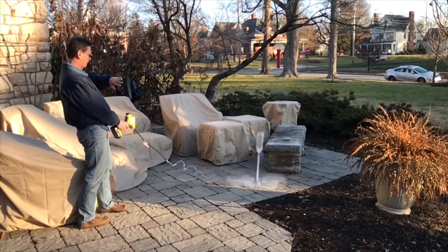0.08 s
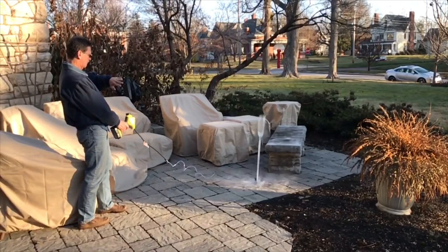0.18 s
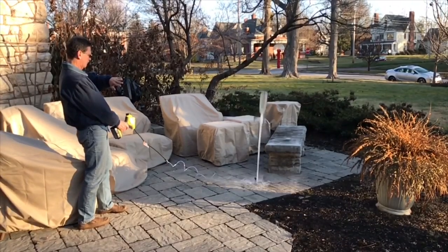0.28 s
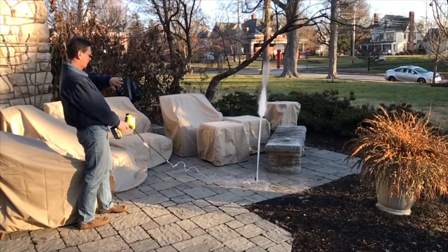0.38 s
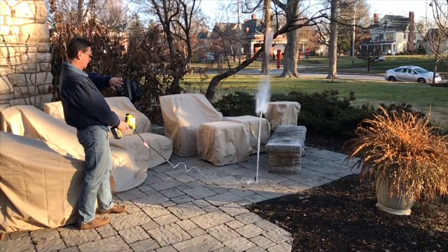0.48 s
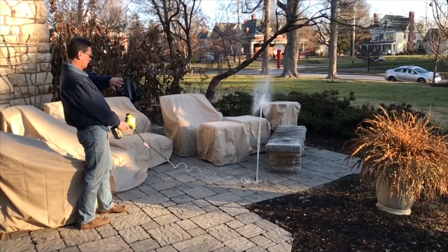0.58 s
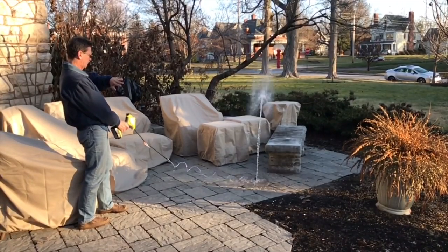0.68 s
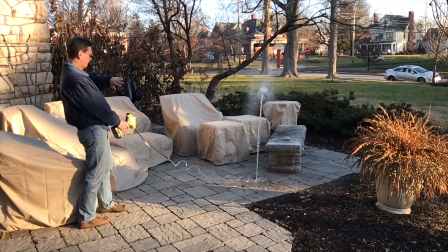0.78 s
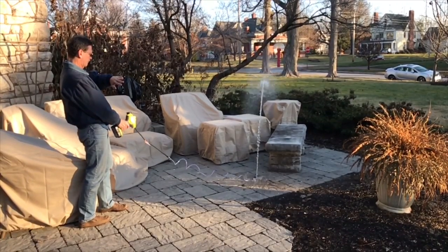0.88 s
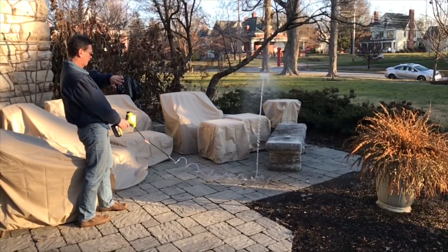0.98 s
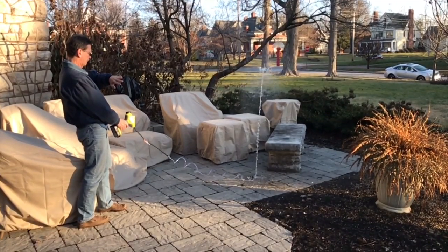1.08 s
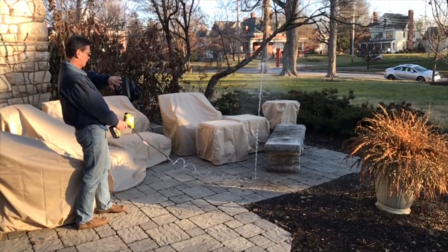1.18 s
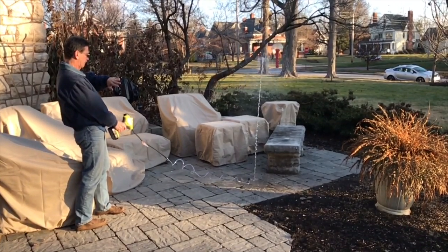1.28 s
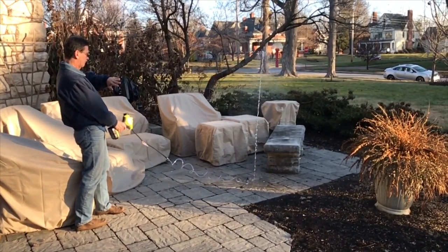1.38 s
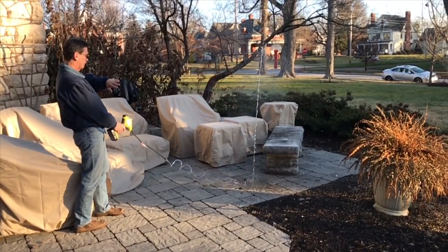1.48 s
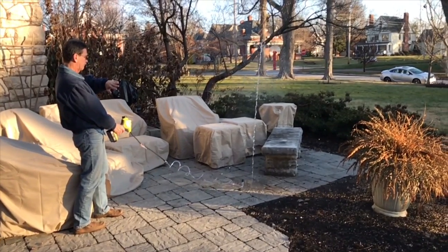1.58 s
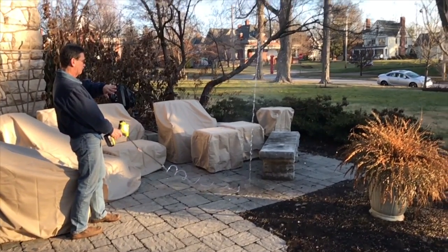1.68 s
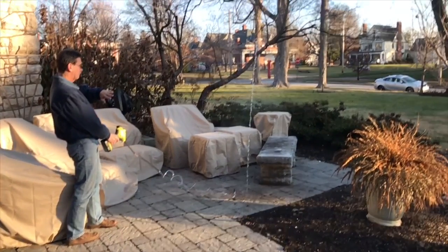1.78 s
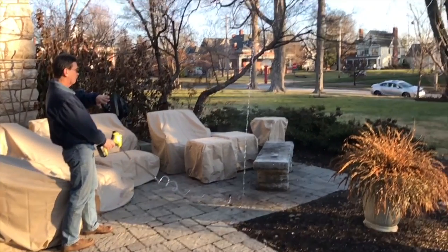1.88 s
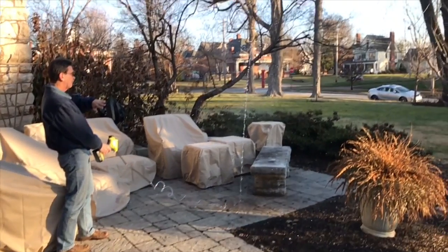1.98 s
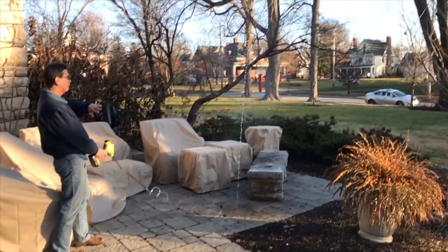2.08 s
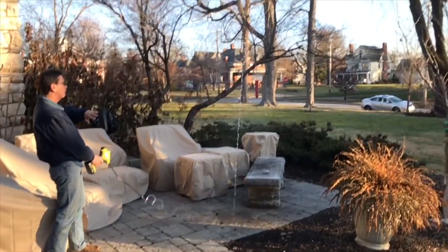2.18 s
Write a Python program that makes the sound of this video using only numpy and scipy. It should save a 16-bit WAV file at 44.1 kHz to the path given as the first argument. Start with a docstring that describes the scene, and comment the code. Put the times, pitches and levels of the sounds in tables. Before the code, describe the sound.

A water rocket pops and whooshes off, then water splashes down as a drill-driven pump rattles.

```python
"""A small air pump rattles and hums on a stone patio, driven by a cordless drill.
A water rocket pops off its stopper: water thumps out, air blasts after it, the rush fades.
Half a second later the water slaps the paving and trails off in drops while the pump runs on.
Under it lie a low outdoor murmur and one soft gust. Nothing sounds above about 2.3 kHz."""
import sys
import numpy as np
from scipy.fft import rfft, irfft
from scipy.io import wavfile

SR = 44100
rng = np.random.default_rng(int(sys.argv[2]) if len(sys.argv) > 2 else 0)


def inscribe(sig):
    """Save sig as 16-bit PCM at rate SR to the path in sys.argv[1].

    A 1-D sig is mono; a 2-D sig holds one channel per row.
    Samples are clipped to [-1, 1] before scaling.
    """
    pcm = np.round(np.clip(np.atleast_2d(sig).T, -1, 1) * 32767)
    wavfile.write(sys.argv[1], SR, pcm.astype(np.int16))


N = 97020
T = np.arange(N) / SR
TOP_HZ = 2310

# stopper pop spectrum: f/Hz, level/dB
POP_SPECTRUM = [(100, -12), (400, -5.5), (700, -5.5), (1000, 7), (1350, -5), (1750, 0), (2300, -9)]
# water leaving the nozzle: t/s, level/dB, f/Hz, rise/s
NOZZLE_GULPS = [(.2422, -5, 124.2, 0.0018), (.2635, -0.5, 143.4, 0.0032), (.2835, -1, 192, 0.0016),
                (.3245, -15, 146.5, 0.0058), (.353, -14.5, 172.7, 0.0052), (.544, -18.5, 137.3, .008)]
# jet hiss spectrum: f/Hz, level/dB
HISS_SPECTRUM = [(80, -4), (250, -2), (500, -0.5), (750, 2.5), (1100, -1), (1600, -0.5), (2000, -2.5),
                 (2400, -8)]
# jet roar spectrum: f/Hz, level/dB
ROAR_SPECTRUM = [(25, -11), (60, -8.5), (100, -4.5), (170, -2), (250, 1.5), (350, -0.5), (520, -5),
                 (650, -22.5), (1200, -24)]
# resonances of the emptying bottle: f/Hz, width/Hz, level/dB
BOTTLE_MODES = [(726, 40, -6), (909, 12, 3), (1489, 40, 0.5), (1660, 20, 1), (1986, 31, -0.5)]
# lumps of water landing: t/s, level/dB, f/Hz, rise/s
WATER_SLAPS = [(.6972, -18.5, 375, 0.0017), (.7146, -11.5, 216, 0.0015), (.7245, -19.5, 162, 0.00271),
               (.738, -19.5, 159, 0.011), (.811, -18, 320, .002), (.8255, -13, 178, 0.0034),
               (1.008, -23, 161, 0.0031)]
# spectrum of the water column landing: f/Hz, level/dB
POUR_SPECTRUM = [(40, -4.5), (110, -0.5), (190, -1), (300, -7.5), (440, 0.5), (600, -20.5), (1200, -24)]
# splash and drop spectrum: f/Hz, level/dB
SPLASH_SPECTRUM = [(100, -11), (400, -10.5), (700, 3.5), (1200, 0.5), (1800, 1), (2300, 4.5)]
# pump stroke peaks: t/s, level/dB
PUMP_STROKES = [(.012, -30), (0.067, -34), (.178, -31.5), (1.001, -33.5), (1.092, -38), (1.21, -34),
                (1.311, -37), (1.479, -39.5), (1.586, -31.5), (1.71, -33), (1.844, -30.5), (1.945, -32),
                (1.977, -32.5), (2.066, -32.5), (2.101, -35.5)]
# pump and drill housing resonances: f/Hz, width/Hz, level/dB
HOUSING_MODES = [(174, 40, -0.5), (337, 130, 2), (536, 92, -5), (873, 22, 6.5), (1091.4, 18, 9.5),
                 (1390, 350, -8.5), (2100, 330, -8.5)]
# motor hum envelope: t/s, level/dB
HUM_ENVELOPE = [(0, -45.5), (.11, -37.5), (.22, -38), (.62, -36.5), (1.0, -37), (1.16, -47), (1.28, -43.5),
                (1.49, -43.5), (1.55, -34.5), (1.6, -38.5), (1.66, -49), (1.88, -42.5), (1.99, -42),
                (2.08, -36.5), (2.2, -42.5)]
# gear whirr spectrum: f/Hz, level/dB
GEAR_SPECTRUM = [(120, -7.5), (300, 2), (450, -0.5), (750, -3), (1090, 0.5), (1250, -1), (1750, -3),
                 (2200, 0), (2500, -4.5)]
# hard contacts: t/s, level/dB, f/Hz, width/Hz, decay/s
CONTACT_TICKS = [(0.172, -28.5, 859, 1368, 0.0044), (.931, -29, 1500, 1180, .003),
                 (1.474, -26.5, 1154, 1433, 0.0032), (1.928, -28, 2197, 200, 0.0099)]
# gust spectrum: f/Hz, level/dB
GUST_SPECTRUM = [(10, 6), (25, -5.5), (50, -10.5), (90, -17.5), (200, -38)]
# air and far traffic spectrum: f/Hz, level/dB
MURMUR_SPECTRUM = [(15, 2.5), (35, -2.5), (70, 2), (130, 4), (250, -3.5), (500, -8.5), (1000, -16),
                   (2400, -18.5)]


def rocket_launch(pop_s=0.2355, blast_s=0.2875):
    """The stopper pops, water jets out in gulps, then air blasts through the neck and recedes."""
    pop = amp(-15.5) * burst(pop_s, attack_s=0.0042, decay_s=0.003) * colour(noise(), POP_SPECTRUM)
    jet_env = amp(-20) * burst(pop_s, attack_s=0.0046, decay_s=0.054)
    blast_env = burst(blast_s, attack_s=0.002, decay_s=0.041)
    rush_env = amp(-22.5) * burst(blast_s, attack_s=0.002, decay_s=0.27)
    hiss_env = np.sqrt(jet_env ** 2 + (amp(-23) * blast_env) ** 2 + rush_env ** 2)
    hiss = hiss_env * colour(noise(), HISS_SPECTRUM)
    bottle = amp(-19.5) * blast_env * ring(noise(), BOTTLE_MODES)
    roar_env = amp(-12) * burst(blast_s, attack_s=0.0067, decay_s=0.064)
    wake_env = amp(-23.5) * burst(pop_s, attack_s=0.0067, decay_s=0.3)
    roar = np.hypot(roar_env, wake_env) * colour(noise(), ROAR_SPECTRUM)
    return pop + thumps(NOZZLE_GULPS) + hiss + bottle + roar


def falling_water(pour_s=0.811, splash_s=0.853):
    """Lumps slap the paving, the column pours and splashes, stray drops patter after it."""
    pour = colour(clicks(per_s=900, spread_db=1), POUR_SPECTRUM)
    pour *= amp(-21.5) * swell(pour_s, rise_s=0.05, fall_s=0.07)
    splash = colour(clicks(per_s=3000, spread_db=0.5), SPLASH_SPECTRUM)
    splash *= amp(-25.5) * swell(splash_s, rise_s=0.026, fall_s=0.04)
    drops = colour(clicks(per_s=1200, spread_db=7.5), SPLASH_SPECTRUM)
    drops *= amp(-34.5) * swell(splash_s, rise_s=0.026, fall_s=0.24)
    patter = ring(clicks(per_s=250, spread_db=6), [(141.6, 110, 0)])
    patter *= amp(-30.5) * swell(splash_s, rise_s=0.05, fall_s=0.2)
    return thumps(WATER_SLAPS) + pour + splash + drops + patter


def drill_pump(stroke_width_s=0.013, hum_hz=176.8, gear_hz=96.9):
    """Each stroke rattles the housing; motor hum and gear whirr follow one wavering speed."""
    stroke_power = sum(amp(db) ** 2 * np.exp(-((T - peak_s) / stroke_width_s) ** 2)
                       for peak_s, db in PUMP_STROKES)
    rattle = np.sqrt(stroke_power) * ring(clicks(per_s=1400, spread_db=3), HOUSING_MODES)
    speed = 1 + 0.05 * wander(rate_hz=25)
    phase_per_hz = 2 * np.pi * np.cumsum(speed) / SR
    hum_db = np.interp(T, *np.array(HUM_ENVELOPE).T) + 1.2 * wander(rate_hz=27)
    hum = amp(hum_db) * np.sqrt(2) * np.sin(hum_hz * phase_per_hz)
    whirr = colour(clicks(per_s=5000, spread_db=0.5), GEAR_SPECTRUM)
    whirr *= 1 + 0.1 * np.sin(gear_hz * phase_per_hz)
    whirr *= amp(-36 + 0.86 * wander(rate_hz=45))
    return rattle + hum + whirr


def lone_ticks(attack_s=0.0013):
    """Short hard contacts, each ringing in its own band."""
    return sum(amp(db) * burst(start_s, attack_s, decay_s) * ring(noise(), [(hz, width_hz, 0)])
               for start_s, db, hz, width_hz, decay_s in CONTACT_TICKS)


def garden():
    """One soft gust over a low murmur of air and far traffic."""
    gust = amp(-28) * swell(peak_s=1, rise_s=0.07, fall_s=0.093) * colour(noise(), GUST_SPECTRUM)
    murmur = amp(-39.5 + 3.6 * wander(rate_hz=12)) * colour(noise(), MURMUR_SPECTRUM)
    return gust + murmur


def thumps(rows):
    """Low pressure swings that swell and die within a few cycles."""
    pressure = np.zeros(N)
    for start_s, db, hz, rise_s in rows:
        age_s = np.maximum(T - start_s, 0)
        envelope = amp(db) * age_s / rise_s * np.exp(1 - age_s / rise_s)
        pressure += envelope * np.sin(2 * np.pi * hz * age_s)
    return pressure


def burst(start_s, attack_s, decay_s):
    """Linear rise, exponential fall."""
    attack = np.clip((T - start_s) / attack_s, 0, 1)
    return attack * np.exp(-np.maximum(T - start_s - attack_s, 0) / decay_s)


def swell(peak_s, rise_s, fall_s):
    """Exponential rise and fall."""
    return np.exp(-np.maximum(peak_s - T, 0) / rise_s - np.maximum(T - peak_s, 0) / fall_s)


def noise():
    """White noise."""
    return rng.standard_normal(N)


def wander(rate_hz):
    """Slow random drift; rms 1."""
    return filtered(noise(), np.exp(-(bins_hz() / rate_hz) ** 2))


def clicks(per_s, spread_db):
    """Random impulses of uneven size."""
    hits = rng.random(N) < per_s / SR
    return hits * np.sign(noise()) * amp(spread_db * np.clip(noise(), -2, 2))


def colour(x, spectrum):
    """Shape by (f/Hz, level/dB) points; rms 1."""
    hz, db = np.array(spectrum, float).T
    return filtered(x, amp(np.interp(np.log(bins_hz()), np.log(hz), db)))


def ring(x, modes):
    """Parallel (f/Hz, width/Hz, level/dB) resonances; rms 1."""
    f = bins_hz()
    response = sum(amp(db) / (1 + 1j * (f * f - hz * hz) / (f * width_hz)) for hz, width_hz, db in modes)
    return filtered(x, response)


def filtered(x, response):
    """Apply a frequency response, cut just above TOP_HZ; rms 1."""
    shaped = irfft(rfft(x) * response * (bins_hz() < TOP_HZ + 100), N)
    return shaped / np.sqrt(np.mean(shaped ** 2))


def bins_hz():
    """FFT bin frequencies, floored at 1 Hz."""
    return np.maximum(np.arange(N // 2 + 1) * SR / N, 1)


def amp(db):
    """Decibels to gain."""
    return 10 ** (np.asarray(db) / 20)


def scene():
    """Mono sum of all sources."""
    return (drill_pump() + rocket_launch() + falling_water() + garden() + lone_ticks())[None]


def record(dry):
    """Low-pass at TOP_HZ with a 20 Hz edge."""
    padded_n = 2 * N
    hz = np.arange(N + 1) * SR / padded_n
    gain = np.clip((TOP_HZ + 10 - hz) / 20, 0, 1)
    return irfft(rfft(dry, padded_n) * gain, padded_n)[:, :N]


dry = scene()
out = record(dry)
inscribe(out)
```